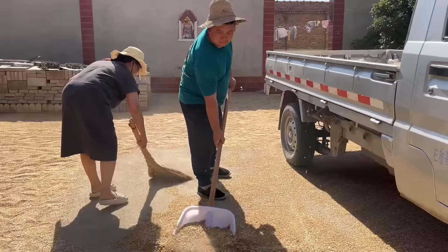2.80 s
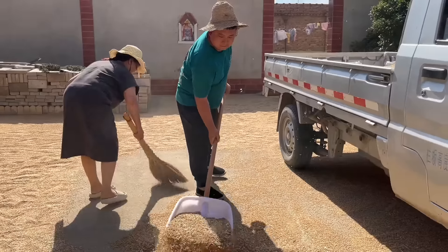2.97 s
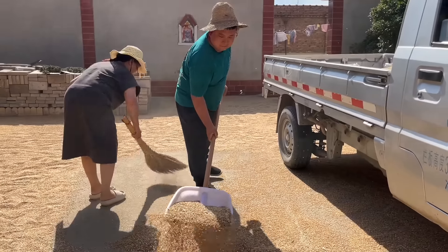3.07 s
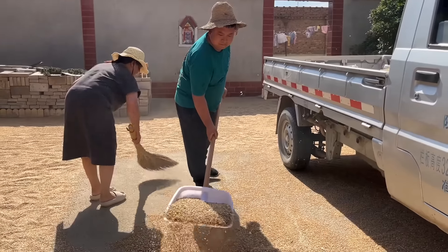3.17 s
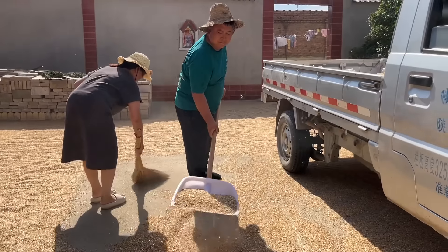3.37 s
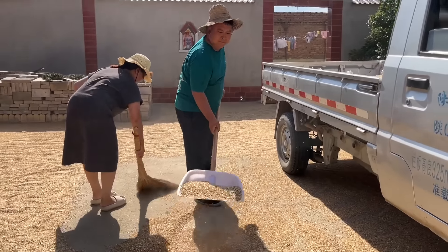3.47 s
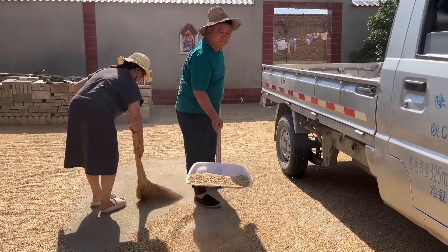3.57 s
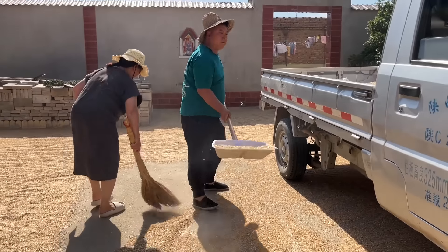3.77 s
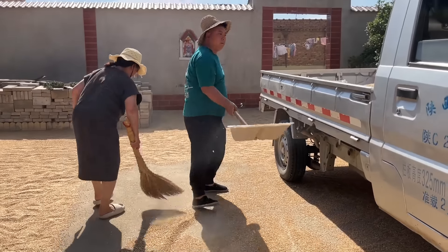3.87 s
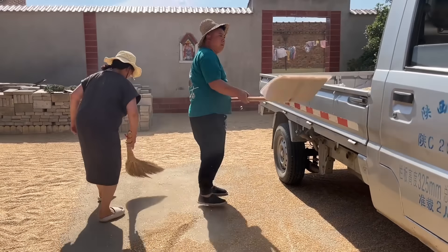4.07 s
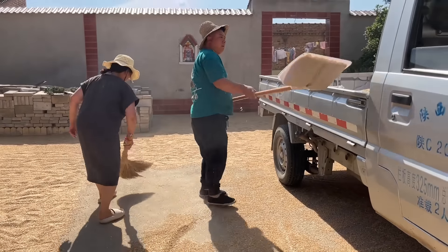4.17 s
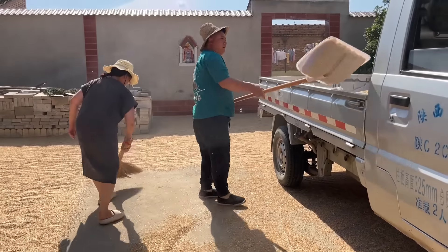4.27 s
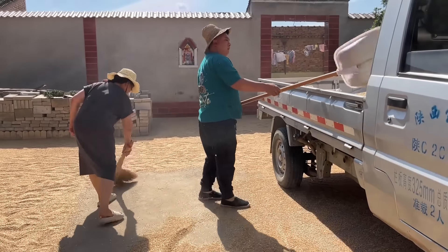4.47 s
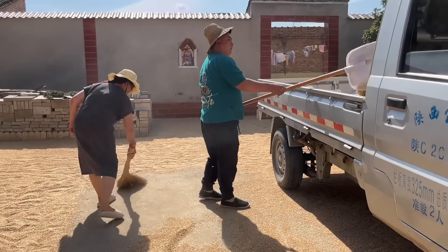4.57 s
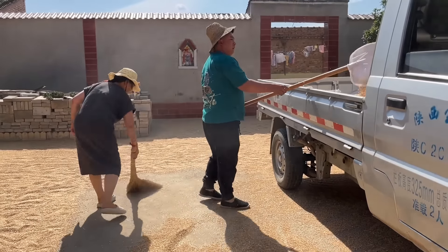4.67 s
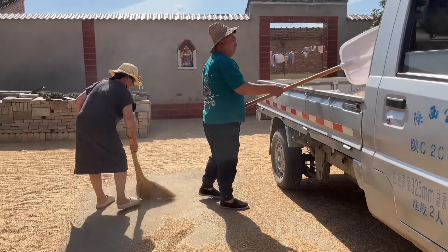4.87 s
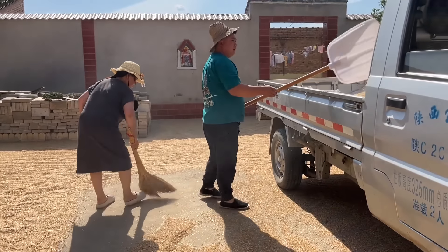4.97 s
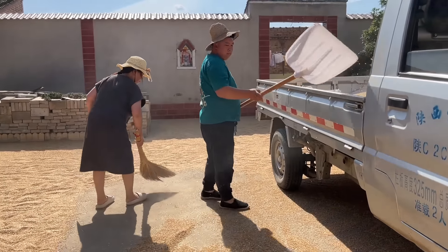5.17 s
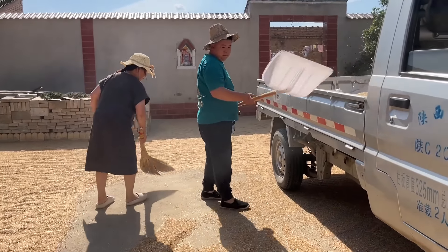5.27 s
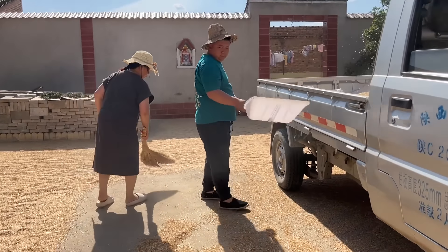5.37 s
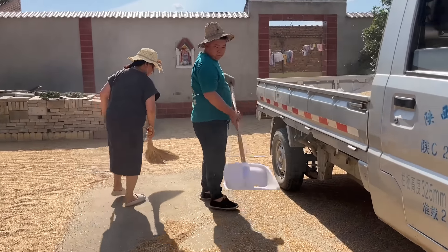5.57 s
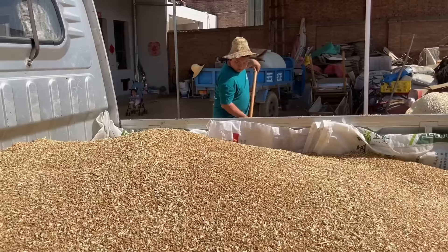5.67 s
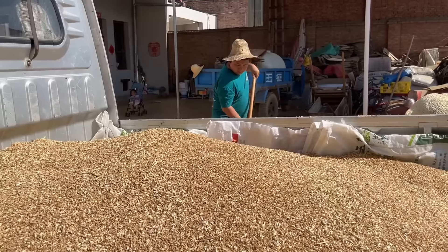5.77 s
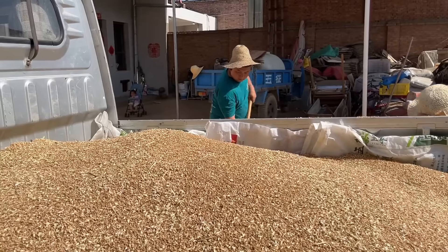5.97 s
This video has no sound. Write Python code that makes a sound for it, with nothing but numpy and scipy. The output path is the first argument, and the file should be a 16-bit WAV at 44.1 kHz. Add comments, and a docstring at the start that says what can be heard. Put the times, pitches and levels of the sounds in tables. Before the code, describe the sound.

Close in a walled farmyard, straw scratches concrete while low wind bumps the microphone. A plastic scoop then drives into grain with a loud hollow scrape and crunch, repeated twice over the next two seconds. Grain hisses and trickles after each push. A quieter stretch of soft sweeping, sliding kernels and scattered ticks follows, with occasional falling sparrow chirps, before one last shovel thrust near the end. Close stereo pickup.

```python
"""A farmyard heard through two microphone ports: first a straw broom on concrete, its flicking tips made of
clumped impacts, while low noise bumps the microphone as a gust. Then a plastic scoop shovel is pushed into
the grain, at about 0.5, 1.4, 2.3 and 5.6 s: clumped impacts excite its resonances and a rasp and crunch.
Between the pushes the broom returns, and loose grain hisses, slides and ticks as impacts, bursts and short rings.
From 1.1 s on a sparrow calls now and then in falling sine whistles, blurred by echoes from the walls."""
import sys
import numpy as np
from scipy import signal
from scipy.fft import rfft, irfft, next_fast_len
from scipy.io import wavfile
from scipy.ndimage import uniform_filter1d

SR = 44100
rng = np.random.default_rng(int(sys.argv[2]) if len(sys.argv) > 2 else 0)


def bounce(signal):
    """Save signal as a 16-bit WAV file at the path given by the first command-line argument."""
    frames = np.transpose(np.atleast_2d(signal))
    limited = np.clip(frames, -1, 1)
    pcm = np.round(limited * 32767).astype(np.int16)
    wavfile.write(sys.argv[1], SR, pcm)


N = 265437
TIME = np.arange(N) / SR
FFT_SIZE = 2 * next_fast_len(N // 2 + 2048)  # room for the filter tails
HZ = np.fft.rfftfreq(FFT_SIZE, 1 / SR)

# Levels in the tables are relative: the trims in scene() and the ports come after them.
# Still air of the yard: frequency_hz, level_db
AIR_SPECTRUM = [(20, -13.5), (60, 5.5), (150, 2), (400, -3.5), (800, -19), (1500, -3), (4000, -15),
                (8000, -27), (15000, -48.5)]
AIR_DB = -68
# Wind on the microphone, its spectrum: frequency_hz, level_db
WIND_SPECTRUM = [(15, -36), (32, -15.5), (50, -6.5), (72, -6), (115, -9.5), (160, -16.5), (240, -27.5),
                 (600, -60)]
# Low bumps and puffs on the microphone: centre_s, level_db, half_length_s (to 1/e)
GUSTS = [(0.049, -34, 0.056), (0.22, -33.5, 0.085), (0.358, -30.5, 0.058), (.488, -26, .014),
         (1.48, -44, .04), (2.33, -49.5, .04), (2.905, -54.5, 0.022), (3.325, -56.5, 0.055)]

# Sparrow calls: start_s, first_pitch_hz (before contour and waver), peak_db, change_per_syllable_db
CHIRPS = [(1.126, 4620, -38.5, -7), (2.095, 4600, -42.5, -4.5), (4.089, 5380, -49, -.5),
          (5.316, 5490, -48.5, .7), (5.577, 4540, -35.5, -5.5)]
# A call steps down toward LOW_NOTE_HZ, keeping STEP_SHARE of the distance at each syllable
SYLLABLE_S, SYLLABLE_SPACING_S, LOW_NOTE_HZ, STEP_SHARE = 0.016, 0.021, 2855, 0.61

# Jolts of the scoop over kernels and knocks of grain on it: start_s, peak_db, pitch_hz, time_to_peak_s
KNOCKS = [(0.6, -15, 425, 0.0034), (0.625, -13.5, 410, .0025), (0.6753, -11, 407, 0.0022),
          (1.391, -17.5, 398, 0.0021), (1.432, -19.5, 412, 0.0027), (2.700, -15, 452, 0.0012),
          (2.726, -17.5, 493, 0.0019), (2.985, -35, 1490, 0.00069), (3.293, -49, 1430, 0.0026),
          (4.127, -51, 1900, 0.0016), (4.204, -50.5, 713, .001), (4.566, -54.5, 380, .005),
          (4.8833, -27.5, 1362, 0.0012), (5.134, -31, 1580, 0.00028), (5.178, -56, 1580, 0.00043),
          (5.266, -42, 1466, 0.0019), (5.428, -46, 1264, .0007), (5.4754, -36, 750, 0.00031),
          (5.502, -32.5, 850, 0.0004), (5.5148, -34, 2330, 0.000095), (5.62, -35, 374, 0.003),
          (5.662, -36, 367, 0.0018), (5.768, -18, 371, 0.0034), (5.848, -32, 350, 0.0052)]
# Snaps of straw and single bouncing kernels: start_s, level_db, decay_s (to 1/e)
SNAPS = [(0.066, -30, 0.0068), (0.221, -49, .002), (0.476, -39.5, 0.0083), (3.887, -54, 0.015),
         (3.903, -65, 0.0058), (3.963, -55.5, 0.0077), (4.126, -49, 0.0045), (4.407, -54, 0.01),
         (4.881, -43.5, 0.0026), (5.136, -47, 0.0013), (5.372, -43.5, 0.0032), (5.4998, -46, .001)]
# Spectrum of the snaps: frequency_hz, level_db
SNAP_SPECTRUM = [(300, -10.5), (1500, 4.5), (3000, 5), (6000, -4), (11000, -5.5), (15000, -9)]

# Grain running off the heap, off the lifted scoop and into the truck:
# start_s, rise_s, hold_s, coast_s, skitter_db, spray_db
SPILLS = [(0.84, .1, 0.32, 0.086, -57, -50.5), (1.9, .146, .475, .15, -60, -55),
          (2.78, 0.014, 0.54, .3, -63, -53), (3.36, 0.16, .15, 0.065, -71, -64.5),
          (4.4, 0.32, 0.068, 0.19, -64, -55.5)]
SPILL_BUILD_DB, SPILL_ATTACK_S = 16, 0.015
# Grain sliding in the lifted scoop:
# start_s, rise_s, hold_s, coast_s, level_db, top_resonance_hz, sag_at_both_ends (0-1)
SLIDES = [(2.796, .004, 0.014, 0.051, -42, 1080, 0.01), (2.8, .2, .195, 0.0095, -52.5, 1470, 0.36),
          (3.248, .04, 0.036, 0.47, -62, 1400, 0.05), (4.349, 0.13, 0.76, .2, -67, 1420, 0.16),
          (5.1, 0.15, 0.08, .06, -59.5, 1450, 0)]
SLIDE_BUILD_DB = 13
# The scoop humming as it rests in the grain, stops and is swung: start_s, rise_s, hold_s, coast_s, level_db
HUMS = [(0, 0.32, 0.098, 0.045, -42.5), (2.797, 0.003, .02, 0.045, -45.5), (3.3, 0.18, 0.28, .15, -78),
        (4.19, 0.33, .02, 0.49, -71)]
HUM_BUILD_DB = 6
# Resonances of the scoop held free: frequency_hz, width_hz, lift_db
FREE_SCOOP_MODES = [(420, 88, -1), (1020, 70, 2.5)]
# Hiss of flying grain: frequency_hz, level_db
SPRAY_SPECTRUM = [(5000, -36), (7500, -26.5), (9200, 0), (11000, 3.5), (13000, -1), (14300, 0),
                  (15500, -22)]

# Broom strokes: start_s, rise_s, hold_s, coast_s, scratch_db, skitter_db, spray_db
SWEEPS = [(-.05, 0.043, .055, 0.072, -44, -60, -55), (0.08, 0.17, 0.14, 0.071, -40.5, -52, -50),
          (3.03, 0.16, 0.011, 0.019, -47.5, -55.5, -55), (3.84, 0.07, 0.032, .15, -77, -83, -79.5),
          (4.2, 0.28, .04, 0.13, -62, -77, -77), (5.02, 0.12, 0.24, 0.4, -68.5, -84.5, -80.5)]
SWEEP_BUILD_DB, SWEEP_ATTACK_S = 12.5, 0.039
# Straw on concrete: frequency_hz, level_db
SCRATCH_SPECTRUM = [(120, -36.5), (300, -15), (480, 1), (750, 5.5), (1200, 1.5), (2300, 4), (3200, -2),
                    (4600, -2), (7000, -23.5), (10000, -30.5)]
# Kernels skittering over the ground: frequency_hz, level_db
SKITTER_SPECTRUM = [(1500, -7), (3000, 2), (4500, 2.5), (6000, 0.5), (7400, 2.5), (8500, -24.5),
                    (10500, -32)]

# Thrusts of the shovel, one group a push (twice the edge first bites, then drives on): start_s, attack_s,
# rise_s, hold_s, coast_s, build_up_db, boom_db, rasp_db, crunch_db, spray_db, load_reached (0-1)
PUSHES = [
    [(0.518, 0.0045, .34, 0.018, .045, 7.5, -23.5, -25, -45, -43.5, .45)],
    [(1.354, 0.021, 0.056, 0.015, 0.051, 0, -27.5, -33, -55, -55, 0),
     (1.49, 0.047, .22, .207, 0.037, 10, -28.5, -26.5, -42.5, -43, .9)],
    [(2.272, 0.0199, 0.048, 0.027, .1, 15, -31.5, -35.5, -55.5, -60.5, 0.1),
     (2.42, 0.054, .26, .095, .002, 19, -29, -31, -46, -47, .7)],
    [(5.577, 0.0022, 0.22, .034, 0.15, 19, -24.5, -29.5, -51.5, -53.5, .2)],
]
# Hollow boom of the scoop: frequency_hz, level_db
BOOM_SPECTRUM = [(30, -52), (60, -23), (130, -12.5), (250, -10.5), (330, -2.5), (450, -3), (620, -8.5),
                 (850, -14.5), (1300, -29), (3000, -54.5)]
# Rasp of the edge: frequency_hz, level_db
RASP_SPECTRUM = [(300, -32), (550, -1), (750, 0), (1000, 2), (1300, -0.5), (2000, -6.5), (2700, -10),
                 (3400, -14), (4500, -29), (8000, -55)]
# Crunch of the kernels: frequency_hz, level_db
CRUNCH_SPECTRUM = [(1200, -33), (2800, 3.5), (3700, 3.5), (5000, 6), (6300, 0), (7400, -2), (8500, -27.5),
                   (10500, -16.5)]
# Bands in which the levels of a push are given: low_hz, high_hz
BOOM_BAND, RASP_BAND, CRUNCH_BAND = (250, 600), (800, 3000), (5200, 7400)
# The scoop rings differently with each load and angle, one table a push: frequency_hz, width_hz, lift_db
PUSH_MODES = [
    [(415, 144, 6), (712, 170, 0.5), (1100, 41, 7.5), (1217, 200, -6), (1944, 630, 5.5), (2540, 190, 6.5),
     (2850, 120, 0.5), (4280, 810, 0.5)],
    [(413, 24, 5), (686, 83, -1), (696, 39, 5.5), (1032, 69, 5), (1530, 55, 4.5), (1665, 40, 4),
     (2140, 120, 5.5), (2550, 160, 3), (4900, 300, 2)],
    [(353, 8.3, 6.5), (410, 14, 10.5), (547, 70, 3.5), (745, 69, 3.5), (1084, 100, 4), (1470, 200, 3.5),
     (2050, 150, 7), (2700, 1900, -2)],
    [(60, 45, 11.5), (155, 87, 3.5), (355.7, 79, 11), (510, 20, 2.5), (674, 24, 6), (1080, 38, 5),
     (1296, 63, 11.5), (1740, 42, 3), (2580, 120, 4.5), (3870, 730, 8.5)],
]
# A full scoop loses its hollow note and rings higher: frequency_hz, width_hz, lift_db
LOADED_MODES = [(388, 160, -2.5), (676, 170, 6)]
# How each part of the sound follows a thrust, as factors on its rise, coast and build-up
BOOM_FOLLOWS, RASP_FOLLOWS, CRUNCH_FOLLOWS = (1.3, 1.19, 0.58), (1.41, 1.12, 1), (1.23, 1.55, 1.66)
CONTACT_S = 0.0034  # usual time for a movement to make contact

# Likeness of the two microphone ports: frequency_hz, likeness (0-1)
LIKENESS = [(60, .96), (290, .88), (640, .68), (1400, .42), (2400, .72), (4400, .5), (6800, .45),
            (8000, .92), (11000, .8), (15000, .8)]
# Phase by which the left port leads: frequency_hz, lead_rad
LEAD = [(100, 0), (600, .25), (1100, .8), (2200, .1), (4400, .9), (6800, -1.0), (7800, -3.0), (8700, -3.3),
        (9500, -5.6), (13200, -6.8), (14800, -9.3)]
# Level of the left port over the right: frequency_hz, balance_db
BALANCE = [(60, .3), (380, 1.2), (1300, 2.3), (2400, 1.3), (4400, 3.4), (8100, .3), (15000, 0)]
# Two brief dips in the level: start_s, end_s, level_db
DIPS = [(0.5, 0.519, -40), (2.782, 2.798, -16)]
TOP_EDGE_HZ = 15450


def amp(db):
    """Decibels to gain."""
    return 10 ** (np.asarray(db) / 20)


def evened(x):
    """Scales to an rms of one."""
    return x / np.sqrt(np.mean(x ** 2) + 1e-20)


def read(points, hz=HZ):
    """Joins frequency_hz, value points on a log-frequency axis."""
    f, value = np.transpose(points)
    return np.interp(np.log(hz + 1), np.log(f + 1), value)


def add(mix, start_s, sound):
    """Mixes a sound in at a time."""
    part = mix[max(round(start_s * SR), 0):][:len(sound)]
    part += sound[:len(part)]


def colour(x, spectrum, modes=(), band=(0, SR / 2)):
    """Causal filter with a spectrum and ringing peaks; white input of rms one gives rms one within the band."""
    db = read(spectrum)
    db = db + sum(lift / (1 + (2 * (HZ - hz) / width) ** 2) for hz, width, lift in modes)
    in_band = (HZ >= band[0]) & (HZ <= band[1])
    power = np.sum(amp(db[in_band]) ** 2) / len(HZ)
    # folding the cepstrum forward in time gives the minimum-phase response
    cepstrum = irfft(db * np.log(10) / 20)
    cepstrum[1:len(HZ)] *= 2
    cepstrum[len(HZ):] = 0
    response = np.exp(rfft(cepstrum))
    return irfft(rfft(x, FFT_SIZE) * response)[..., :N] / np.sqrt(power)


def resonate(x, hz, width):
    """A resonance of gain one that follows a pitch curve."""
    turn = np.exp(2j * np.pi * np.cumsum(hz) / SR)
    r = np.exp(-np.pi * width / SR)
    # shift the pitch to zero, smooth, shift back
    return 2 * (turn * signal.lfilter([1 - r], [1, -r], x / turn)).real


def kernels(per_s, spread_db, clump_db, clump_hz):
    """Two trains of tiny impacts of uneven size that bunch into shared clumps."""
    slow = rfft(rng.standard_normal(FFT_SIZE)) / (1 + (HZ / clump_hz) ** 4)
    clumps = evened(irfft(slow)[:N])
    sizes = amp(spread_db * np.minimum(rng.exponential(1, N), 4))
    hits = rng.standard_normal((2, N)) * (rng.random(N) < per_s / SR)
    return evened(hits * sizes * amp(clump_db * clumps))


def stroke(start, rise, hold, coast, build_db, follows=(1, 1, 1), attack=CONTACT_S):
    """Gain of one movement: it makes contact, builds to full speed, holds, and coasts to rest."""
    t, (lag, linger, depth) = TIME - start, follows
    contact = np.clip(t / attack, 0, 1)
    to_go = np.clip(1 - t / (rise * lag), 0, 1)
    slowing = 1 + np.maximum(t - rise - hold, 0) / (coast * linger)
    return contact * amp(-build_db * depth * to_go ** 2) / slowing ** 2


def strokes(rows, build_db, attack=CONTACT_S):
    """Plays a table of movements: one gain curve for each of its level columns."""
    return sum(amp(row[4:])[:, None] * stroke(*row[:4], build_db, attack=attack) for row in rows)


def yard(x, t60):
    """Scattered echoes from walls and truck, as two unrelated tails that fall 60 dB in t60 seconds."""
    t = TIME[:SR // 2]
    echoes = rng.standard_normal((2, len(t))) * (rng.random((2, len(t))) < 0.04)
    taps = echoes * (t > 0.008) * amp(-60 * t / t60)
    return signal.fftconvolve(x[None], taps / np.linalg.norm(taps[0]), axes=1)[:, :N]


def ports(pair):
    """Two unrelated signals become left and right: the ports share part of the sound, shifted in phase."""
    a, b = rfft(pair, FFT_SIZE)
    same = np.clip(read(LIKENESS), 0, 0.995)
    tilt = amp(read(BALANCE) / 2)
    shared, apart = a * np.sqrt((1 + same) / 2), b * np.sqrt((1 - same) / 2)
    left = (shared + apart) * tilt
    right = (shared - apart) / tilt * np.exp(-1j * read(LEAD))
    return irfft([left, right])[:, :N]


def air():
    """Low buffeting on the microphone, as puffs of low noise, over the steady quiet noise of the yard."""
    gust, still = rng.standard_normal((2, 2, N))
    puffs = sum(amp(db) * np.exp(-((TIME - s) / half) ** 2) for s, db, half in GUSTS)
    return colour(gust, WIND_SPECTRUM) * puffs + amp(AIR_DB) * colour(still, AIR_SPECTRUM)


def sparrow(rough, wet_db, left_db, count=4):
    """Each call steps down in wavering whistles that arch and drop, blurred by the walls on the left."""
    song = np.zeros(N)
    u = np.linspace(-1, 1, round(SYLLABLE_S * SR))  # place within a syllable
    contour = 1 + 0.12 * (1 / 3 - u ** 2) - 0.025 * u
    for start, first_hz, db, step_db in CHIRPS:
        for k in range(count):
            waver = evened(uniform_filter1d(rng.standard_normal(4000), size=30))[:len(u)]
            note_hz = LOW_NOTE_HZ + (first_hz - LOW_NOTE_HZ) * STEP_SHARE ** k
            pitch = note_hz * (contour + rough * waver)
            whistle = np.sqrt(1 - u ** 2) * np.sin(2 * np.pi * np.cumsum(pitch) / SR)
            add(song, start + k * SYLLABLE_SPACING_S, amp(db + k * step_db) * whistle)
    blurred = 0.83 * song + amp(wet_db) * yard(song, t60=0.42)
    return blurred * amp([[left_db / 2], [-left_db / 2]])


def ticks(wet_db, crack_db):
    """Knocks crack and ring dead plastic for a few cycles; snaps are short bright bursts."""
    knocks, snaps, t = np.zeros(N), np.zeros((2, N)), TIME[:2500]
    for start, db, hz, rise in KNOCKS:
        crack = evened(uniform_filter1d(rng.standard_normal(len(t)), size=9))
        ring = np.sin(2 * np.pi * hz * t) + amp(crack_db) * crack
        add(knocks, start, amp(db) * t / rise * np.exp(1 - t / rise) * ring)
    for start, db, decay in SNAPS:
        for side in snaps:
            add(side, start, amp(db) * np.exp(-t / decay) * rng.standard_normal(len(t)))
    direct = np.array([knocks, np.zeros(N)])  # no unshared part
    return direct + colour(snaps, SNAP_SPECTRUM) + amp(wet_db) * yard(knocks, t60=0.13)


def loose_grain(spraying, spray_db, width_hz):
    """Kernels hiss against one another; sliding grain hums the scoop and sounds a resonance, arched in most slides."""
    fine = kernels(per_s=14000, spread_db=-1.2, clump_db=0.2, clump_hz=119.6)
    sliding = kernels(per_s=2500, spread_db=0.8, clump_db=1.0, clump_hz=40.2)
    spray = colour(fine, SPRAY_SPECTRUM, band=(9500, 14000)) * spraying
    hum = colour(sliding, BOOM_SPECTRUM, FREE_SCOOP_MODES) * strokes(HUMS, HUM_BUILD_DB)[0]
    sound = amp(spray_db) * spray + hum
    for start, rise, hold, coast, db, hz, sag in SLIDES:
        place = np.clip(2 * (TIME - start) / (rise + hold) - 1, -1, 1)
        pitch = hz * (1 - sag * place ** 2)
        slide = evened(resonate(resonate(sliding, pitch, width_hz), pitch, width_hz))
        sound += amp(db) * slide * stroke(start, rise, hold, coast, SLIDE_BUILD_DB)
    return sound


def broom(scratching, skittering, scratch_db, skitter_db):
    """Straw tips catch and flick free as dense impacts, and kernels skitter over the ground."""
    flicks = kernels(per_s=9000, spread_db=0.5, clump_db=0.8, clump_hz=90)
    scratch = colour(flicks, SCRATCH_SPECTRUM, band=(1900, 3100)) * scratching
    skitter = colour(flicks, SKITTER_SPECTRUM, band=(6200, 7400)) * skittering
    return amp(scratch_db) * scratch + amp(skitter_db) * skitter


def thrust(start, attack, rise, hold, coast, build_db, boom_db, rasp_db, crunch_db, spray_db, load):
    """Gains of empty scoop, full scoop, rasp, crunch and spray; the scoop fills as it advances."""
    boom, rasp, crunch = (stroke(start, rise, hold, coast, build_db, follows, attack)
                          for follows in (BOOM_FOLLOWS, RASP_FOLLOWS, CRUNCH_FOLLOWS))
    advance = np.clip((TIME - start) / rise, 0, 1)
    filled = np.clip(load * advance * crunch ** 0.5, 0, 1)
    boom = amp(boom_db) * boom
    return np.array([boom * (1 - filled), boom * filled,
                     amp(rasp_db) * rasp, amp(crunch_db) * crunch, amp(spray_db) * crunch])


def shovel(pushes, boom_db, rasp_db, crunch_db):
    """The edge judders over concrete and kernels; the plastic scoop booms with the bumps, higher as it fills."""
    bumps = kernels(per_s=3500, spread_db=0.0, clump_db=0.2, clump_hz=60)
    scrapes = kernels(per_s=8000, spread_db=1.1, clump_db=0.52, clump_hz=106)
    crunching = amp(crunch_db) * colour(scrapes, CRUNCH_SPECTRUM, band=CRUNCH_BAND)
    sound = np.zeros((2, N))
    for (empty, full, rasp, crunch, _), modes in zip(pushes, PUSH_MODES):
        boom = empty * colour(bumps, BOOM_SPECTRUM, modes, BOOM_BAND)
        boom += full * colour(bumps, BOOM_SPECTRUM, [*modes, *LOADED_MODES], BOOM_BAND)
        rasping = rasp * colour(scrapes, RASP_SPECTRUM, modes, RASP_BAND)
        sound += amp(boom_db) * boom + amp(rasp_db) * rasping + crunch * crunching
    return sound


def scene():
    """The work and air through the two ports, and the bird further off; shovel, broom and spills throw up grain."""
    pushes = [sum(thrust(*row) for row in push) for push in PUSHES]
    scratching, swept_skitter, swept_spray = strokes(SWEEPS, SWEEP_BUILD_DB, SWEEP_ATTACK_S)
    spilt_skitter, spilt_spray = strokes(SPILLS, SPILL_BUILD_DB, SPILL_ATTACK_S)
    # gains of the same sound from several causes join as powers
    skittering = np.hypot(swept_skitter, spilt_skitter)
    spraying = np.sqrt(sum(pushes)[-1] ** 2 + swept_spray ** 2 + spilt_spray ** 2)
    work = ticks(wet_db=-20.0, crack_db=-18.5)
    work += loose_grain(spraying, spray_db=-1.5, width_hz=520)
    work += broom(scratching, skittering, scratch_db=-4, skitter_db=0.0)
    work += shovel(pushes, boom_db=0.53, rasp_db=1.0, crunch_db=2.5)
    return ports(air() + work) + sparrow(rough=0.048, wet_db=-1.0, left_db=5.0)


def record(dry):
    """The level dips twice for a moment, with softened edges; then a steep low-pass limits the treble."""
    level = np.ones(N)
    for start, end, db in DIPS:
        level[(TIME > start) & (TIME < end)] = amp(db)
    low_pass = signal.firwin(511, TOP_EDGE_HZ, window=("kaiser", 9), fs=SR)
    return signal.oaconvolve(dry * uniform_filter1d(level, size=100), low_pass[None], "same")


dry = scene()
out = record(dry)
bounce(out)
```